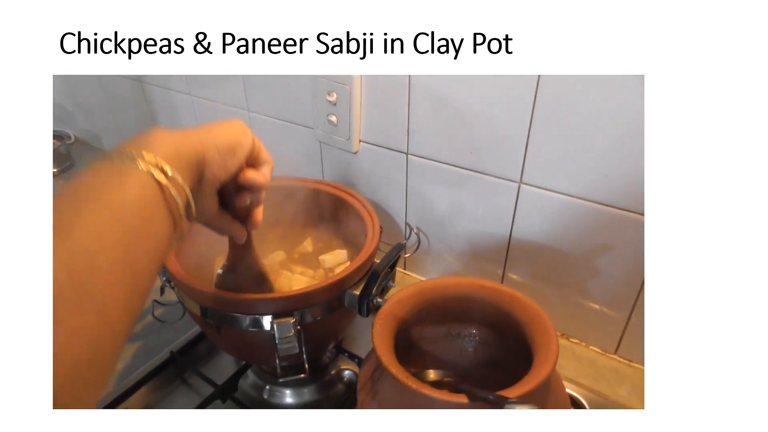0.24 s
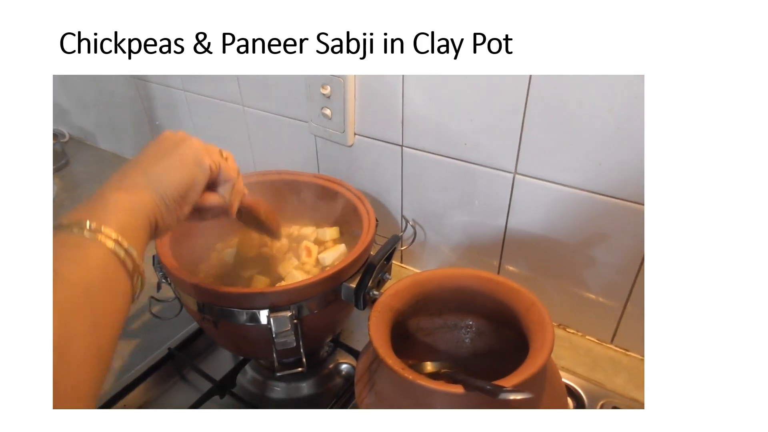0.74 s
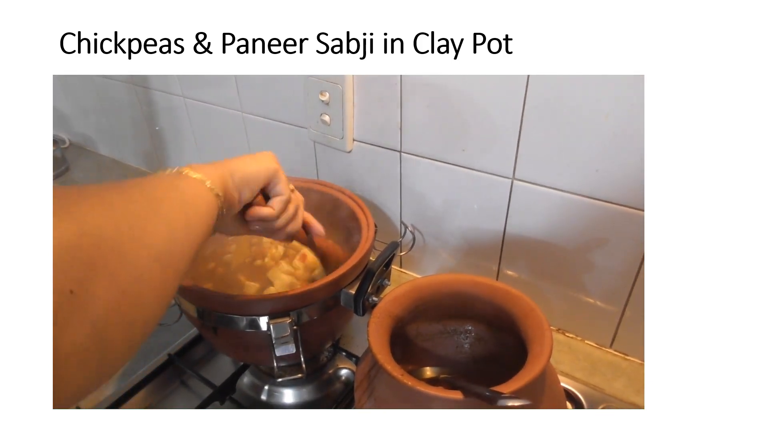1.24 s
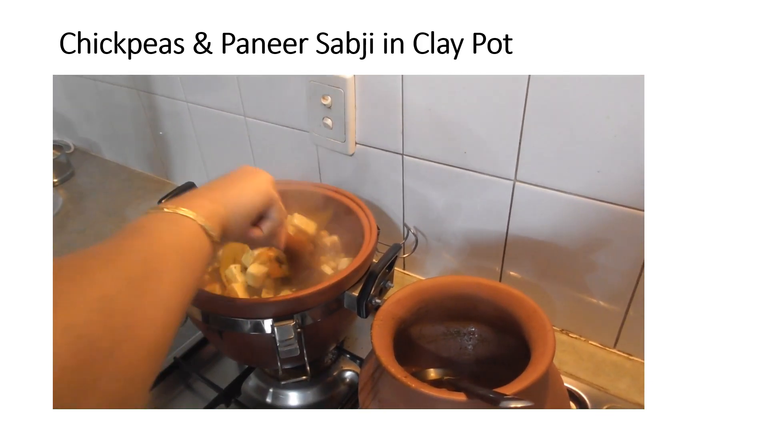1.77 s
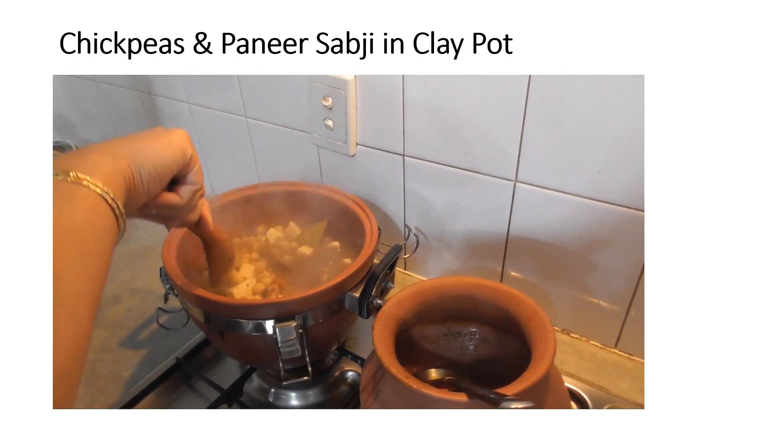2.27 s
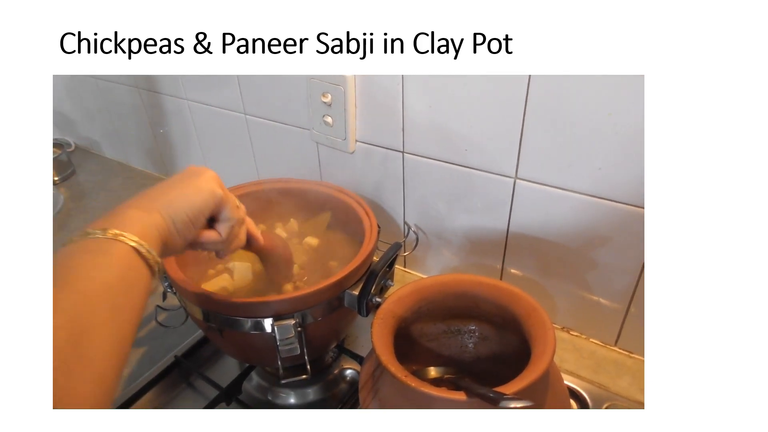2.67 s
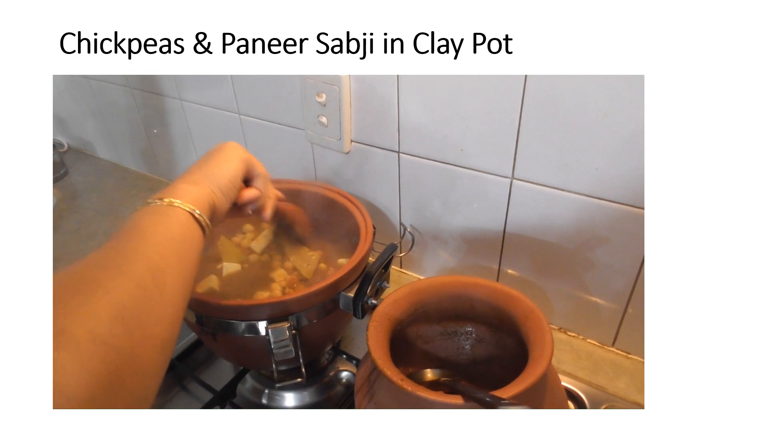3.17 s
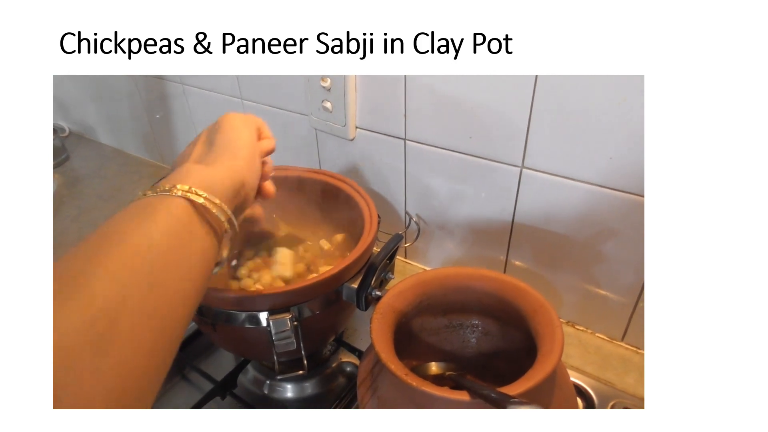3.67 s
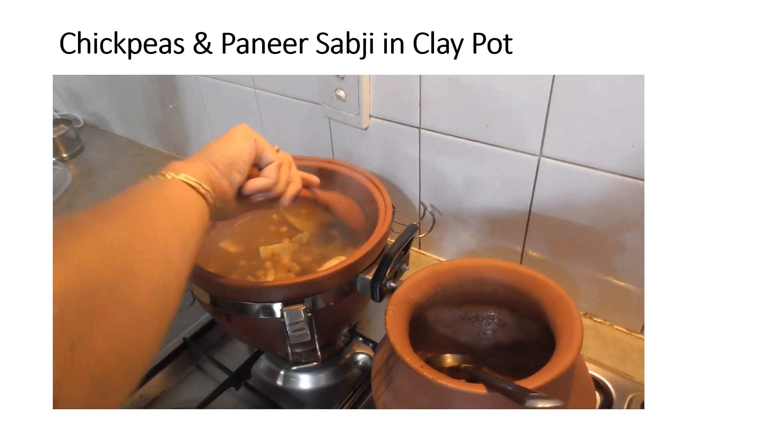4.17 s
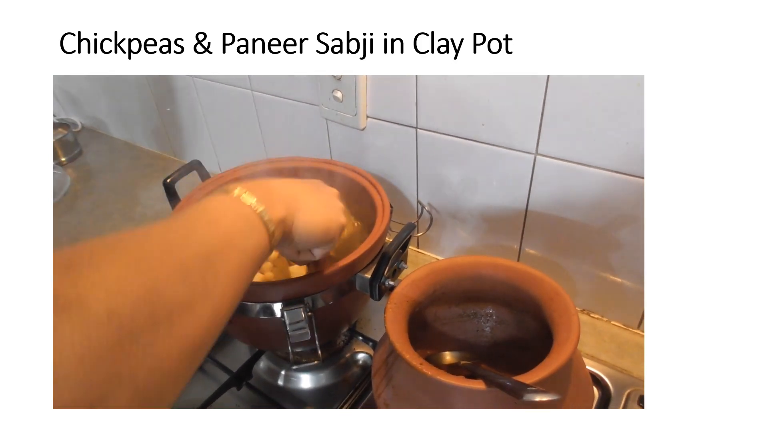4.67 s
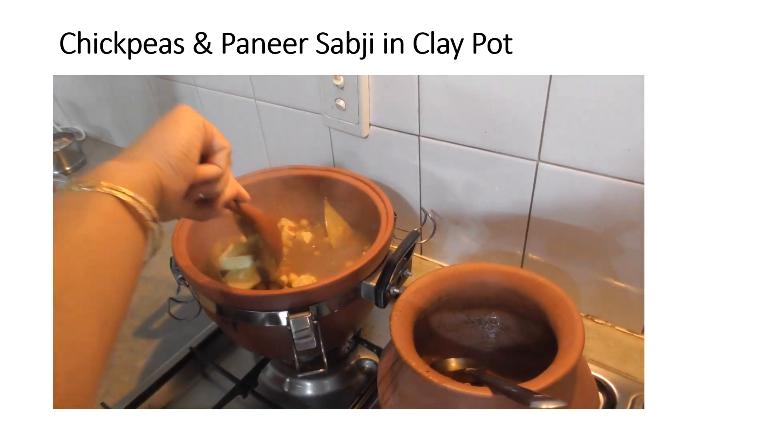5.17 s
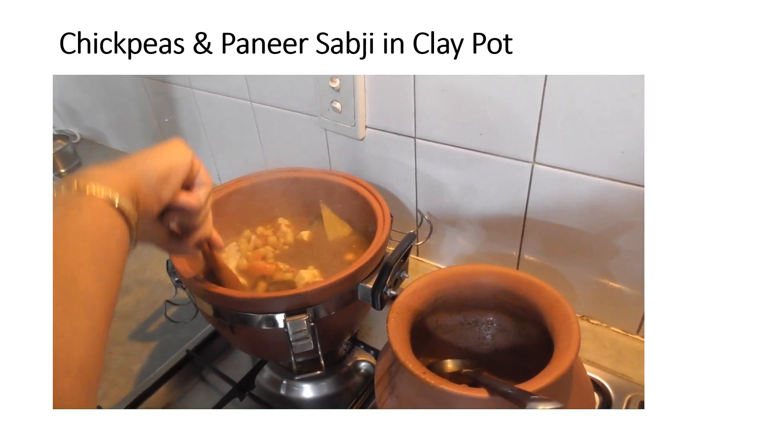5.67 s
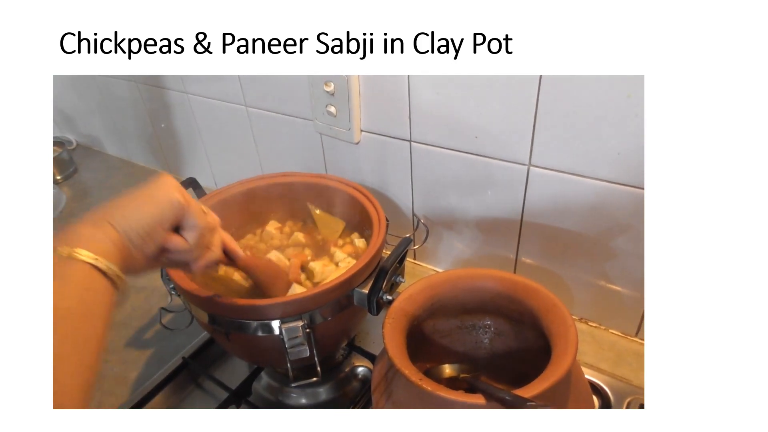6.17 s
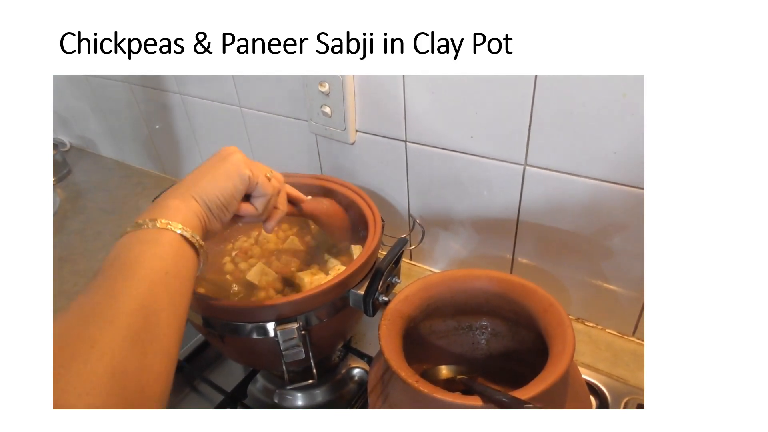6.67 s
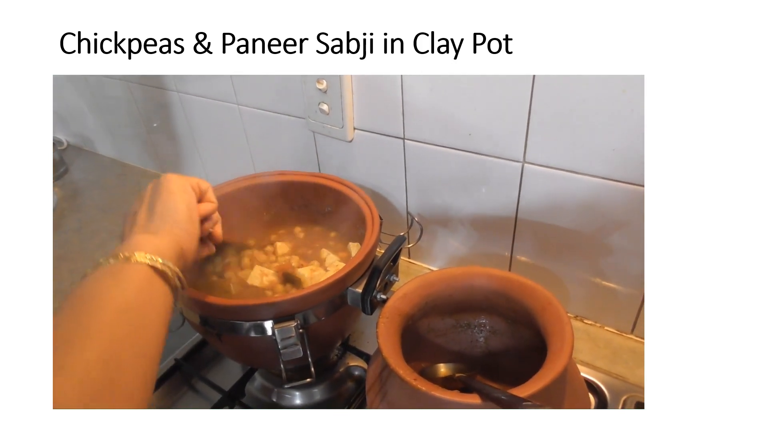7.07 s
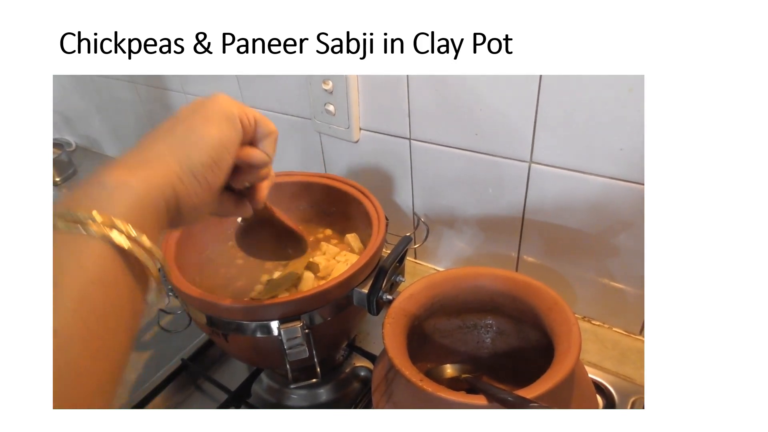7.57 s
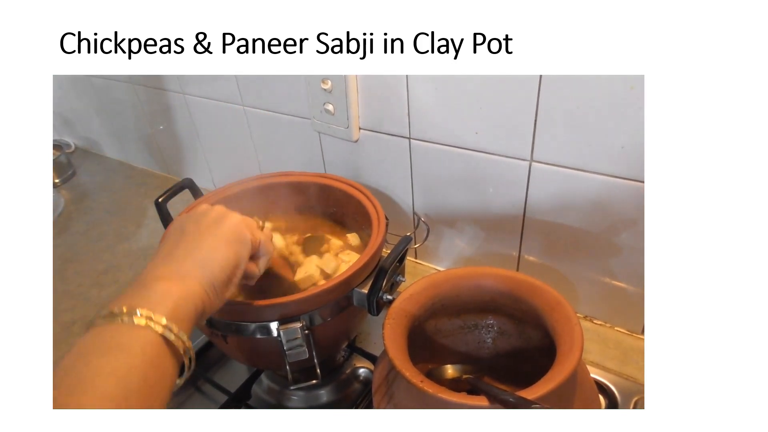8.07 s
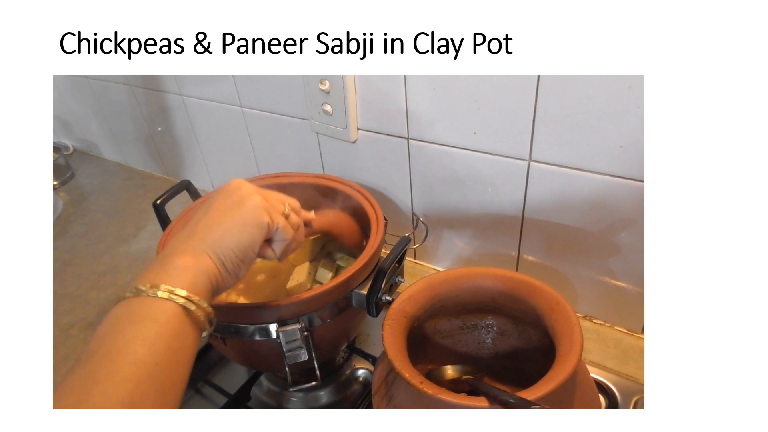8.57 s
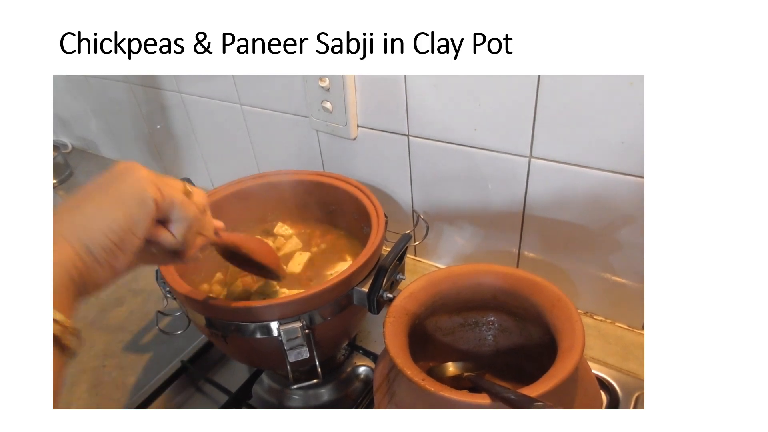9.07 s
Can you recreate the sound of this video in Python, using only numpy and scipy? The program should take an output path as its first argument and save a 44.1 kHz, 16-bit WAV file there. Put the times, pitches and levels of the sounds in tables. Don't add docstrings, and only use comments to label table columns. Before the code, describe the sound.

A gas burner runs throughout, fluttering low with a hollow roar and thin hiss, growing fuller until about 3 seconds, then steady to the end near 9.3. Small wet pops and crisp ticks dot the first second; faint high bangle clinks come at 0.8 to 1.1. A cushioned spoon thud at 1.0 leads into gritty scrapes on clay until 1.4. Light crackles follow, then the loudest, rasping knock at 3.0 with scraping after, a small clack at 3.5 and a full knock with drag at 4.1. A bright burst of spitting and ticks comes at 5.0. A dry knock at 5.6 is followed by a soft pot-rocking thud at 5.8, a hard knock at 6.6 with scratchy scrapes, and lighter taps at 6.9 and 7.3. It calms, with faint rubbing, bangle clinks at 8.4 and 9.2, and a bright scrape at 8.8. Close microphone, short tiled-room reverberation.

```python
import sys
import numpy as np
from scipy import signal
from scipy.fft import rfft, irfft, next_fast_len
from scipy.io import wavfile
from scipy.ndimage import uniform_filter1d, map_coordinates

SR = 44100
rng = np.random.default_rng(int(sys.argv[2]) if len(sys.argv) > 2 else 0)


def wrap_up_sound(samples):
    columns = np.atleast_2d(samples).T
    tamed = np.clip(columns, -1, 1)
    steps = np.round(tamed * 32767).astype(np.int16)
    wavfile.write(sys.argv[1], SR, steps)


def amplitude_ratio(level_db):
    exponent = np.asarray(level_db, float) / 20
    return 10 ** exponent


N = 411453

# t/s, rasp peak level/dB, thud level/dB, body level/dB, clack level/dB
KNOCKS = [
    (0.9797, -18, -12, -5.5, -31),
    (2.9974, -12, -30, -10, -14.5),
    (3.5183, -42.5, -20, 3.5, -1),
    (4.0727, -15, -17, -6.5, -13),
    (5.5662, -13.5, -37, -12, -14.5),
    (5.7905, -35, -0.5, 5.5, -33),
    (6.6166, -13.5, -20, -4.5, -12),
    (6.8716, -28.5, -28, -6, -22),
    (7.2719, -35, -37, -6, -9),
]
# f/Hz, level/dB, t60/s
THUD = [(118.4, 0.5, 0.14), (196.7, 4.5, 0.05), (296.3, -5, 0.18)]
# f/Hz, level/dB, t60/s
CLAY = [(321, -11, 0.02), (411, 1, 0.037), (486.5, -3.5, 0.12), (611, -5, 0.059), (725, 1.5, 0.069),
        (862, -10, 0.16), (960, -12, 0.027), (1066, -1.5, 0.017)]


def unit(x):
    return x / np.sqrt(np.mean(x ** 2) + 1e-20)


def along(points, hz):
    f, value = np.transpose(points)
    return np.interp(np.log(hz + 1), np.log(f + 1), value)


def bumps(table, hz):
    return sum(db / (1 + (2 * (hz - centre) / width) ** 2) for centre, width, db in table)


def curve(points):
    s, value = np.transpose(points)
    return np.interp(np.arange(N) / SR, s, value)


def wobble(rate):
    knots = rng.standard_normal(int(N * rate / SR) + 4)
    return map_coordinates(knots, [np.arange(N) * rate / SR])


def filtered(x, response):
    m = next_fast_len(x.shape[-1] + 8192)
    spectrum = rfft(x, m) * response(np.fft.rfftfreq(m, 1 / SR))
    return irfft(spectrum, m)[..., :x.shape[-1]]


def rush(gain):
    # f/Hz, left-right correlation
    alike = [(30, 1), (100, 0.96), (1000, 0.9), (2000, 0.94), (7000, 0.99), (8700, 0.79), (10000, 0.93),
             (11000, 0.11), (15000, 0.31)]

    def split(hz):
        turn = np.arccos(np.clip(along(alike, hz), -1, 1)) / 2
        return gain(hz) * np.array([np.cos(turn), np.sin(turn)])

    mid, side = filtered(rng.standard_normal((2, N)), split)
    return unit(np.array([mid + side, mid - side]))


def patches(x, depth_db, size):
    bins = signal.stft(x, nperseg=size)[2]
    field = uniform_filter1d(rng.standard_normal(bins.shape[1:]), 3, 0)
    field = uniform_filter1d(field, 6, 1)
    return signal.istft(bins * amplitude_ratio(depth_db * unit(field)), nperseg=size)[1][:, :N]


def grit(colour, grain_db, patchy_db, size):
    grains = rush(lambda hz: amplitude_ratio(along(colour, hz))) * amplitude_ratio(grain_db * wobble(500))
    return unit(patches(grains, patchy_db, size))


def ring(modes, t, scatter_db, detune):
    out = 0
    for hz, db, t60 in modes:
        strength, pitch, phase = rng.standard_normal(3)
        decay = amplitude_ratio(db + scatter_db * strength - 60 * t / t60)
        out = out + decay * np.sin(2 * np.pi * hz * (1 + detune * pitch) * t + 0.31 * phase)
    return out


def shaken():
    def pot(f):
        modes = sum(amplitude_ratio(db) * 1j * f / t60 / (hz * hz - f * f + 3.5j * f / t60)
                    for hz, db, t60 in THUD + CLAY)
        return modes / (1 + (f / 1050) ** 8)

    return unit(filtered(rng.standard_normal(N), pot))


def add(track, s, sound):
    room = track[..., round(s * SR):][..., :sound.shape[-1]]
    room += sound[..., :room.shape[-1]]


def kitchen(x):
    # f/Hz, t60/s
    tiles = [(200, 0.53), (2000, 0.25), (10000, 0.051)]
    hz, t, bins = signal.stft(rng.standard_normal((2, SR // 2)), SR, nperseg=256)
    decay = amplitude_ratio(-60 * t / along(tiles, hz)[:, None])
    tail = signal.istft(bins * decay, SR, nperseg=256)[1]
    delayed = np.pad(x, (150, 0))[None]
    return signal.fftconvolve(delayed, tail / np.linalg.norm(tail[0]), axes=1)[:, :N]


def burner():
    # t/s, roar level/dB
    flame = [(0, -57.5), (.4, -56), (1.0, -53.5), (2.05, -52.5), (2.9, -48), (4.3, -49), (6.2, -49.5),
             (9.33, -49)]
    # f/Hz, density level/dB
    rumble_colour = [(12, -36), (20, -12.5), (70, -7.5), (108, -0.5), (144, -4.5), (188, -6.5), (260, -18),
                     (340, -46), (570, -120)]
    # f/Hz, density level/dB
    roar_colour = [(140, -58), (230, -7.5), (520, -1.5), (567, -6.5), (623, -4), (684, -6), (922, -7),
                   (1350, -22.5), (1500, -22), (1950, -67), (3300, -120)]
    # f/Hz, width/Hz, lift level/dB
    hollows = [(302.4, 27, 7), (389.7, 24, 10.5), (480, 15, 4.5), (523, 27, 5.5), (634, 17, 7),
               (766, 18, 3.5), (860, 24, 1.5), (1010, 140, 2)]
    # f/Hz, density level/dB
    hiss_colour = [(760, -50.5), (1300, -12), (1380, -25), (1510, -14.5), (2490, -13), (3670, -16),
                   (4480, -8), (5290, -15.5), (7320, -1), (9620, 3), (10900, -10.5), (13300, -11),
                   (15900, -18.5)]
    # f/Hz, width/Hz, lift level/dB
    jet = [(2460, 91, 2), (4530, 210, 4), (5870, 90, 0), (6880, 59, -4), (8000, 80, 4), (8770, 82, -0.5),
           (9250, 60, 0), (9450, 90, 1.5)]
    roar_db = curve(flame)
    sway, heavy_db, peak_s, end_s = 0, -20, 0.2, 0.68
    for s, db, *_ in KNOCKS:
        if db > heavy_db:
            sway = sway + curve([(s, 0), (s + peak_s, 1), (s + end_s, 0)])
    follows = 0.17
    rumble_db = -53.5 + follows * (roar_db - roar_db.mean()) + 4.5 * sway + 1.6 * wobble(9)
    roar_db = roar_db + 0.5 * sway + 0.58 * wobble(12)
    hiss_db = -55.5 + 0.16 * wobble(6.5)
    rumble = amplitude_ratio(rumble_db) * rush(lambda hz: amplitude_ratio(along(rumble_colour, hz)))
    roar = amplitude_ratio(roar_db) * rush(lambda hz: amplitude_ratio(along(roar_colour, hz) + bumps(hollows, hz)))
    hiss = amplitude_ratio(hiss_db) * rush(lambda hz: amplitude_ratio(along(hiss_colour, hz) + bumps(jet, hz)))
    return rumble + roar + hiss


def bangles():
    # t/s, peak level/dB, main ring f/Hz, lower twin level over it/dB, t60/s
    touches = [
        (0.785, -47.5, 12950, -1, 0.098),
        (1.034, -54, 12800, -6, 0.13),
        (1.128, -50, 11450, -10, .14),
        (8.3804, -50.5, 12950, -20, 0.15),
        (8.6213, -57, 12940, 10.5, 0.088),
        (9.2138, -49.5, 13000, -2, 0.13),
    ]
    # f over the main ring, level/dB, share of t60
    partials = [(.623, 3, 0.9), (.882, -4, 1), (1.174, -10, .6)]
    out, t = np.zeros((2, N)), np.arange(SR // 4) / SR
    twin, twin_life, main_db = 0.97, 0.65, 7
    pan_db = -7 * np.array([[.5], [-.5]])
    for s, db, hz, twin_db, t60 in touches:
        lift_db = max(twin_db, 0)
        modes = [(hz, main_db, t60), (hz * twin, main_db + twin_db, t60 * twin_life)]
        modes += [(hz * ratio, level + lift_db, t60 * life) for ratio, level, life in partials]
        contact = np.diff(rng.standard_normal(len(t) + 2), 2)
        tick = 0.5 * amplitude_ratio(lift_db - 60 * t / 0.003) * contact
        add(out, s, amplitude_ratio(db - 1.0 + pan_db) * (ring(modes, t, 1.1, 0.001) + tick))
    return out


def pops():
    # t/s, peak level/dB, centre f/Hz
    large = [(0.1131, -54, 2920), (0.3262, -51, 3980), (0.395, -47, 3940), (0.5367, -44, 3520),
             (1.8257, -46, 4030), (1.883, -52, 3040), (2.054, -48, 3600), (2.2987, -49, 4440),
             (2.641, -41.5, 4960), (4.481, -40, 3150), (4.8499, -47, 3800), (4.9954, -43, 2360),
             (5.1687, -45, 5000), (6.0696, -48, 4530), (6.129, -48, 3430), (6.1544, -47, 4230),
             (6.2831, -48, 3020), (7.024, -35, 4320), (8.1564, -51, 1790), (0.456, -54, 3500),
             (8.787, -44, 4750)]
    # t/s, peak level/dB, centre f/Hz
    small = [(0.1047, -45, 8080), (0.2498, -41, 8630), (0.3355, -38, 7500), (0.4569, -42.5, 7570),
             (1.3134, -37, 7600), (1.9054, -37, 6700), (1.976, -42, 7240), (2.0323, -39, 7350),
             (2.091, -34.5, 7500), (2.2069, -39, 8140), (2.2533, -36.5, 8200), (2.8567, -38, 8230),
             (3.254, -35, 7695), (3.639, -39.5, 9000), (4.948, -27, 7700), (4.953, -32, 9600),
             (4.962, -28, 8000), (4.9733, -24, 7600), (5.0296, -39, 7910), (5.0465, -35, 7560),
             (5.5199, -48, 7300), (5.699, -35, 7000), (5.738, -33, 7200), (5.9893, -43, 8300),
             (6.4514, -42, 8520), (7.1881, -36.5, 8350), (7.9104, -40, 8100), (8.0065, -35.5, 8000),
             (8.2087, -43, 7150), (8.267, -33.5, 7100)]
    # t/s, peak level/dB, centre f/Hz
    snags = [(0.978, -25, 8400), (2.997, -13, 8500), (2.9972, -18, 4500), (1.1615, -32, 8600),
             (1.2014, -34, 9000), (1.2458, -37, 7800), (1.2787, -33, 6800), (1.367, -40, 9500),
             (3.137, -31, 8000), (3.2278, -41, 7900), (5.5195, -32, 8500), (6.6997, -35, 7800),
             (6.718, -38, 7500), (6.768, -29, 7500), (6.8453, -37, 7000), (6.9451, -33, 7000),
             (7.0589, -35, 7100), (1.8816, -37, 8000), (1.757, -51, 5000), (3.5181, -36, 2930),
             (3.5185, -39, 5500), (4.948, -34, 5490), (5.79, -38, 7000), (5.808, -40.5, 4000),
             (5.5574, -36, 8200), (7.2736, -38, 2870), (6.2914, -36, 7960), (6.739, -28, 6590),
             (6.778, -25.5, 7500), (6.8084, -29, 7100), (7.1527, -34, 3530), (7.153, -30, 8160),
             (7.1891, -36, 4493), (8.515, -40, 8810)]
    # t/s, peak level/dB, centre f/Hz
    ticks = [(1.9054, -42, 11500), (4.961, -34, 12500), (4.974, -38, 14000), (5.0, -44, 11000),
             (5.018, -44, 13000), (5.074, -44, 11500), (5.196, -42, 10800), (7.46, -48, 14500),
             (7.945, -46, 11500), (8.143, -46, 14000), (7.19, -44, 12500), (2.385, -48, 12000),
             (0.2237, -29.5, 10500), (0.5367, -48, 13500), (0.7452, -38, 13000), (1.8816, -30, 12600),
             (2.141, -31.5, 10800), (2.3007, -34, 10500), (2.4014, -43, 11700), (2.6085, -38, 11100),
             (2.7896, -47, 13000), (4.9185, -33, 9000), (4.9521, -27, 13700), (5.088, -32, 12400),
             (5.1113, -45, 13500), (5.1687, -34, 11000), (5.2719, -33, 11900), (6.4862, -44, 12700),
             (6.8458, -49, 10500), (7.3412, -44, 10500), (8.1147, -53, 10800), (8.1878, -43, 11050)]
    # width as share of centre, t60/s
    kinds = [(0.33, 0.025), (0.21, 0.025), (0.69, 0.018), (0.54, 0.01)]
    out, t = np.zeros((2, N)), np.arange(SR // 20) / SR
    events = [row + kind for rows, kind in zip((large, small, snags, ticks), kinds) for row in rows]
    for when, level, size in rng.random((90, 3)):
        events.append((when * N / SR, -58 + 7 * level, 5500 * 2.4 ** size, 0.4, 0.01))
    air = rush(np.ones_like)
    for s, db, hz, share, t60 in events:
        edges = np.clip([hz * (1 - share / 2), hz * (1 + share / 2)], [200, 400], [SR / 3, SR / 2.2])
        band = signal.butter(2, edges, "band", fs=SR, output="sos")
        spit = signal.sosfilt(band, air[:, rng.integers(N - SR):][:, :len(t)])
        envelope = amplitude_ratio(db - 4.5 - 60 * t / t60) * (1 - np.exp(-t / 0.0004))
        add(out, s, envelope * unit(spit))
    return out


def rubs():
    # start t/s, length/s, level/dB, centre f/Hz
    spots = [(.285, 0.021, -51, 6300), (1.097, 0.045, -53, 4600), (1.257, 0.056, -56, 4200),
             (1.66, .02, -53.5, 6650), (3.225, 0.039, -58, 3700), (3.302, 0.036, -56, 3500),
             (4.157, .04, -54, 3500), (4.189, 0.039, -49, 7200), (4.918, .02, -44, 9000),
             (5.113, .025, -59, 4600), (5.513, .02, -52, 3570), (6.701, 0.018, -55, 3900),
             (6.782, 0.018, -53, 3900), (6.939, 0.017, -57, 2600), (7.02, 0.026, -47, 4260),
             (8.21, .025, -56, 6100), (8.775, 0.031, -43.5, 7500), (8.771, 0.051, -49, 4450),
             (9.29, .03, -71, 3000), (2.052, .025, -68, 2270)]
    out, share = np.zeros((2, N)), 0.22
    for s, length, db, hz in spots:
        size = round(length * SR)
        noise = rng.standard_normal(SR // 8)
        band = filtered(noise, lambda f: 1 / (1 + (2 * (f - hz) / (share * hz)) ** 4))
        add(out, s, amplitude_ratio(db) * unit(band)[:size] * np.sin(np.linspace(0, np.pi, size)))
    return out


def strokes():
    # start t/s, length/s, level/dB, dull level over it/dB, pot rumble level over it/dB
    slides = [(0.99, 0.062, -48.5, -8.5, 0), (1.059, 0.086, -43, -11.5, -2.5),
              (1.144, 0.074, -48, -10.5, -5), (1.24, 0.078, -46, -10, -4.5), (3.044, 0.12, -46.5, -7, -1.5),
              (3.22, 0.052, -50, -12, -12), (3.295, 0.054, -44, -9.5, -16), (3.452, 0.029, -56, -10, 0),
              (4.111, 0.078, -51, -5.5, -4), (4.174, 0.072, -43, -8.5, -2.5), (4.239, 0.075, -49.5, -7, 4),
              (4.86, 0.073, -55.5, -11, -16), (4.924, 0.047, -43, -9, -9), (4.975, 0.11, -55.5, -10, -13),
              (5.683, 0.086, -51.5, -10, -19), (6.652, .11, -50, -8, -0.5), (6.758, 0.062, -43, -10.5, -14),
              (6.862, 0.072, -44.5, -7, -7.5), (7.011, 0.07, -47.5, -5.5, -11), (7.785, 0.32, -63.5, -8, 1),
              (8.766, 0.031, -44, -8, -20)]
    # start t/s, length/s, level/dB, dull and rumble level over it/dB
    flicks = [
        (.283, 0.051, -48, -16, -23),
        (1.37, 0.032, -53, -13, -2),
        (3.016, 0.03, -35.5, -12, -5),
        (3.16, 0.059, -52, -10, -8),
        (4.476, 0.057, -50, -6, -6),
        (5.5185, 0.023, -40, -8.5, -21),
        (5.6, 0.092, -47, -11.5, 7),
        (5.786, 0.046, -45, -12, -7),
        (6.94, 0.097, -52, -7.5, 3),
        (8.795, 0.057, -51.5, -12, -18),
    ]
    # f/Hz, density level/dB
    scrape = [(850, -54), (1450, -19), (1750, -10.5), (2300, -15.5), (2800, -13.5), (4250, -7),
              (5000, -7.5), (7280, -1.5), (8890, -4.5), (10600, -9), (15300, -16), (15900, -27)]
    bright, dull, low = np.zeros((3, N))
    press_s, lift_s, bite_s, edge_db = 0.014, 0.0096, 0.0037, -19
    tail_s = 0.017
    shaped = [(row, press_s, row[1] - lift_s) for row in slides]
    shaped += [(row, bite_s, bite_s) for row in flicks]
    for (s, length, db, dull_db, low_db), on, off in shaped:
        end = length + tail_s
        t = np.arange(round(end * SR)) / SR
        drag = amplitude_ratio(db + np.interp(t, [0, on, off, end], [edge_db, 0, 0, edge_db]))
        add(bright, s, drag)
        add(dull, s, amplitude_ratio(dull_db) * drag)
        add(low, s, amplitude_ratio(low_db) * drag)
    rough = grit(scrape, 2.4, patchy_db=2.0, size=384)
    rough = patches(rough, depth_db=2.0, size=96)
    judder = amplitude_ratio(1.5 * wobble(70))
    split_hz = 5500
    top = unit(filtered(rough, lambda hz: hz > split_hz))
    under = unit(filtered(rough, lambda hz: hz <= split_hz))
    return judder * (bright * top + dull * under) + low * shaken()


def knocks():
    # f/Hz, level/dB, t60/s
    clack = [(1710, -23, 0.034), (2080, -8, 0.0038), (3850, -3, 0.022)]
    # f/Hz, density level/dB
    rasp_colour = [(760, -37), (1300, -41), (1380, -67), (1660, 4.5), (2130, -17), (2440, -10),
                   (2890, -11.5), (4350, -9.5), (5370, -8.5), (8080, 1), (10500, -3.5), (15200, -11),
                   (16000, -51)]
    # t/s, peak level/dB, f/Hz, t60/s
    pushes = [(0.9808, -25.5, 775, 0.05), (0.9948, -33.5, 200, 0.096), (1.0045, -27, 300, 0.069),
              (1.017, -36, 720, .03), (1.067, -37, 104, 0.097), (2.293, -35, 260, 0.028),
              (2.9979, -9.5, 675, 0.012), (2.997, -23, 115, 0.027), (2.998, -21, 930, 0.019),
              (2.9972, -22.5, 2200, 0.0064), (2.9972, -24, 3800, 0.0091), (2.9975, -38, 1930, .012),
              (3.012, -28.5, 860, .04), (4.957, -34, 840, 0.017), (5.567, -34, 1200, 0.0092),
              (3.518, -29.5, 1040, 0.0087), (4.074, -22.5, 528, 0.04), (4.076, -24, 730, 0.042),
              (4.077, -31, 330, 0.046), (5.572, -44, 1760, 0.15), (5.572, -43, 1850, .1),
              (5.571, -28.5, 914, 0.042), (5.795, -34.5, 198, .08), (1.84, -60, 1930, 0.031),
              (6.622, -29, 750, 0.025), (4.086, -30, 296, 0.035), (4.092, -33, 910, .03),
              (4.097, -30.5, 195, 0.072), (4.12, -32, 315, .03), (4.135, -37, 290, .03),
              (4.163, -40, 140, .05), (4.252, -38, 300, 0.045), (4.266, -38, 200, .05),
              (4.074, -34, 1170, .02), (6.625, -31, 860, 0.056), (5.566, -16.5, 850, 0.01),
              (5.7905, -30, 680, 0.017), (5.790, -41.5, 1150, 0.034), (6.618, -23, 840, 0.035),
              (6.872, -22, 596, 0.013), (7.273, -35, 1120, 0.012), (6.62, -32, 370, 0.055),
              (6.63, -31, 750, 0.034), (6.655, -37, 480, .06), (6.70, -41, 600, 0.036),
              (9.09, -44.5, 740, 0.047), (7.273, -45, 1960, 0.025)]
    (body, rattle, skid, dull), t = np.zeros((4, N)), np.arange(SR // 2) / SR
    steady = 0.006
    for s, db, thud_db, clay_db, clack_db in KNOCKS:
        rise = 0.0013 - 0.00009 * clack_db
        press = 1 - np.exp(-t / (0.39 * rise))
        rung = amplitude_ratio(thud_db + 3.0) * ring(THUD, t, 4.6, 0.027)
        rung += amplitude_ratio(clay_db - 4.5) * ring(CLAY, t, 2.1, steady)
        rung += amplitude_ratio(clack_db - 0.5) * ring(clack, t, 0.81, steady)
        add(body, s, amplitude_ratio(db) * press * rung)
        add(rattle, s, amplitude_ratio(db + clay_db - 8.0 - 60 * t / 0.16) * press)
        add(skid, s, amplitude_ratio(db - 7.5 - 60 * t / 0.096) * (1 - np.exp(-t / rise)))
        add(dull, s, amplitude_ratio(db + clack_db - 1.0 - 60 * t / 0.041) * press)
    for s, db, hz, t60 in pushes:
        envelope = amplitude_ratio(db + 5 - 60 * t / t60) * (1 - np.exp(-t * hz / 0.36))
        add(body, s, envelope * np.sin(2 * np.pi * hz * t))
    rasp = grit(rasp_colour, 1.3, patchy_db=1.0, size=128)
    under = filtered(rasp, lambda hz: hz < 3000)
    return body + rattle * shaken() + skid * (rasp - under) + dull * unit(under)


def scene():
    near = knocks() + strokes() + rubs() + pops() + bangles()
    return near + amplitude_ratio(-13.5) * kitchen(near[1]) + burner()


def top_cut(x):
    return signal.sosfilt(signal.butter(12, 15950, fs=SR, output="sos"), x)


def record(dry):
    # f/Hz, width/Hz, level/dB
    case = [(1388, 213, -14), (2460, 100, 2), (3620, 200, -3.5), (4450, 140, 0), (5210, 800, -5),
            (7120, 82, -3.5), (7500, 190, 4.5), (7650, 73, -4), (7830, 250, 4.5), (8420, 230, -0.5),
            (8720, 250, 3), (9200, 120, -3.5), (9750, 360, 2.5), (13100, 670, 0)]
    # f/Hz, left over right level/dB
    lean = [(30, 3), (100, -4.5), (300, -0.6), (1000, 1), (2000, 0), (9000, 0), (13000, -1.5)]
    # f/Hz, lead of the left/rad
    lead = [(30, 0.31), (350, 0.49), (900, 0.19), (1300, -0.6), (2200, -0.14), (4500, -0.19),
            (9000, -0.094), (11000, -1.95), (13000, 0.88), (15500, 0.87)]
    side, top_hz = np.array([[.5], [-.5]]), 15950

    def port(hz):
        gain = amplitude_ratio(bumps(case, hz) + along(lean, hz) * side)
        return gain * np.exp(1j * along(lead, hz) * side) * (hz < top_hz)

    return top_cut(filtered(dry, port))


dry = scene()
out = record(dry)
wrap_up_sound(out)
```